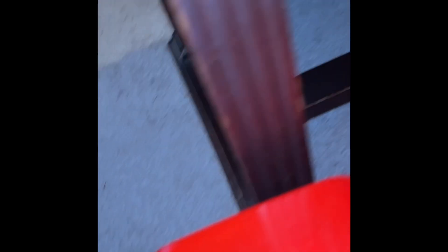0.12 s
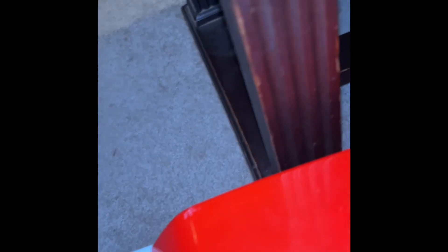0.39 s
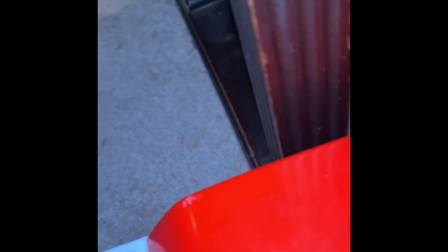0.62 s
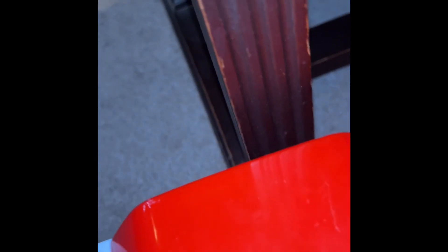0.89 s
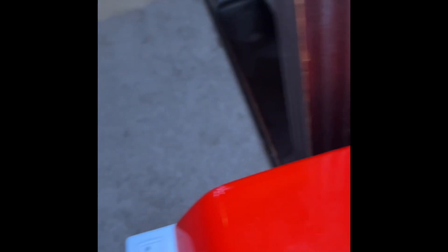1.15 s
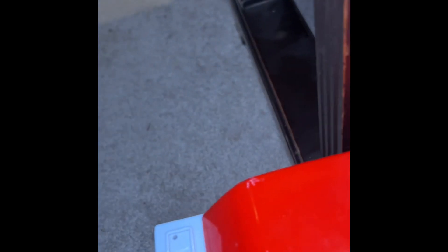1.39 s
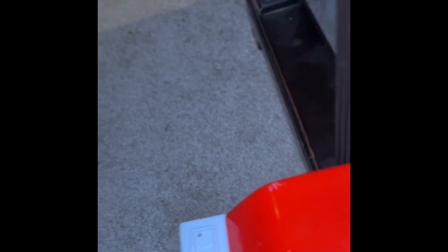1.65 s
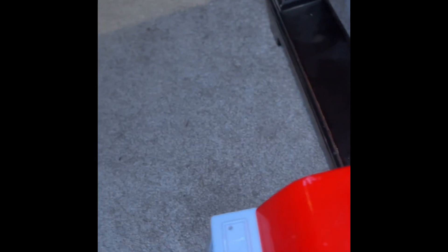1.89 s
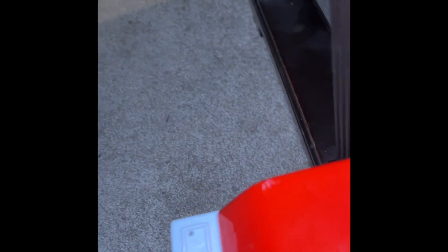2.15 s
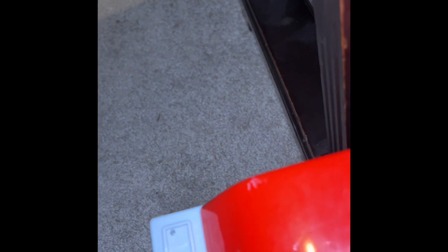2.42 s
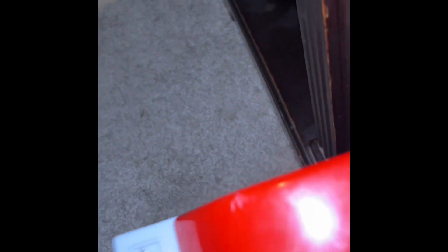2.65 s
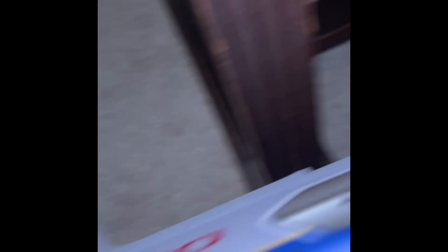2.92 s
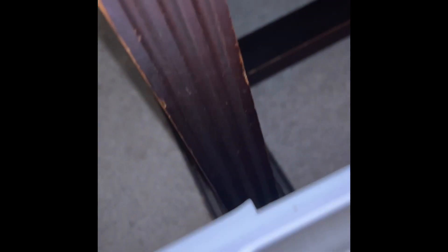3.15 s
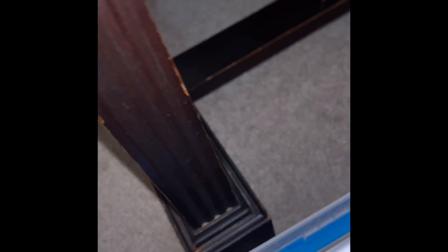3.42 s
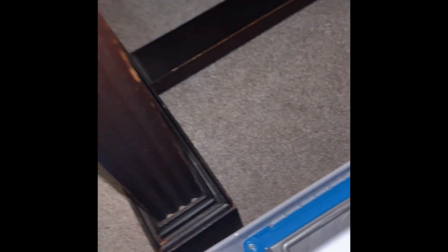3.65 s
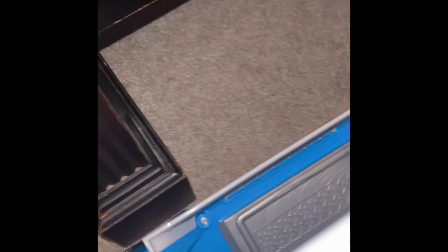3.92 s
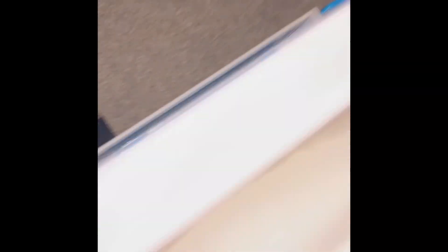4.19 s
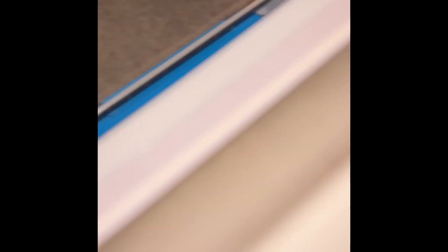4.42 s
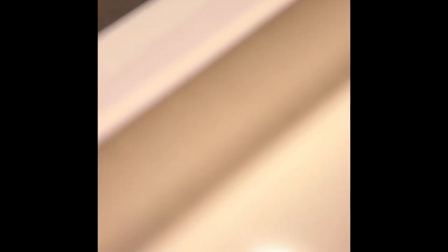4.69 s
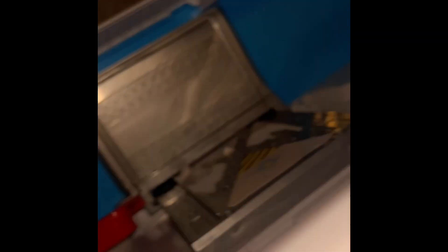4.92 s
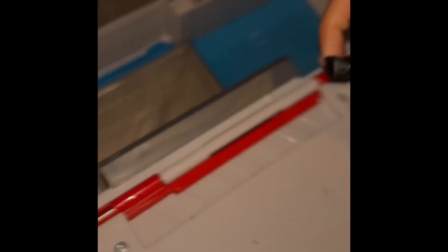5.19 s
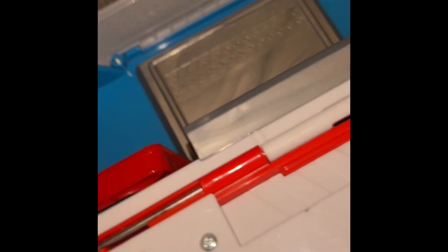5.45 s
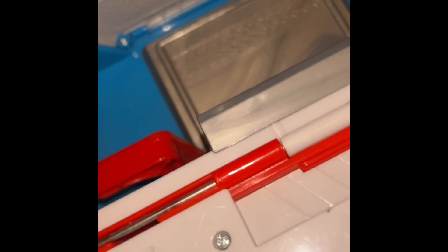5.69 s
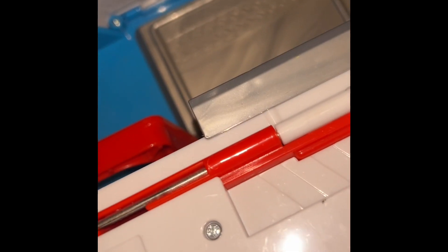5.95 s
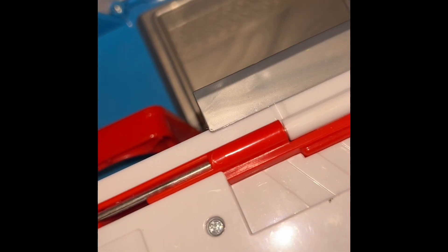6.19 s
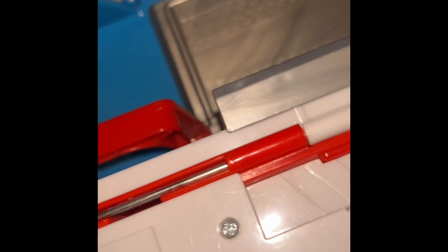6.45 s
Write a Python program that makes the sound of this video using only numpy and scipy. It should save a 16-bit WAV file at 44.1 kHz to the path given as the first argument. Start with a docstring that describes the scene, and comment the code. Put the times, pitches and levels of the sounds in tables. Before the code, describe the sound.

Plastic parts knock, scrape and click as hands turn and open a toy, loudest at a snapping latch, in a quiet carpeted room.

```python
"""In a quiet carpeted room, close by, a large hollow plastic toy is turned, opened and latched by hand.
Hard edges click and chatter and the shell booms dully: bursts of micro-contacts ring damped modes.
Parts drag and a drawer slides out by stick and slip; fingers rustle as shaped, grainy noise.
Soft low thumps are bass noise and one damped sine; a short room tail follows and a faint floor of
coloured noise lies below."""
import sys
import numpy as np
from scipy import signal
from scipy.fft import rfft, irfft
from scipy.io import wavfile
from scipy.ndimage import uniform_filter1d

SR = 44100
rng = np.random.default_rng(int(sys.argv[2]) if len(sys.argv) > 2 else 0)


def master(y):
    """Save y as 16-bit WAV."""
    cut = np.clip(np.atleast_2d(y).T, -1, 1)
    pcm = np.round(cut * 32767)  # scale
    wavfile.write(sys.argv[1], SR, pcm.astype(np.int16))


def how_loud(loudness_db):
    """Turn decibels into a plain amplitude multiplier (0 dB gives 1, 20 dB gives 10)."""
    steps = np.asarray(loudness_db, float) / 20
    return 10 ** steps


N = 290075


def rms_one(x):
    """Power normalisation: scales a signal to unit rms."""
    return x / np.sqrt(np.mean(x ** 2) + 1e-20)


def at_hz(points, hz):
    """Logarithmic frequency axis: interpolates a table evenly per octave."""
    table_hz, values = np.transpose(points)
    return np.interp(np.log(hz), np.log(table_hz), values)


def filtered(x, order, hz, kind="low"):
    """Linear filtering: a Butterworth filter of the given order and kind."""
    return signal.sosfilt(signal.butter(order, hz, kind, fs=SR, output="sos"), x)


def coloured(spectrum):
    """Spectral shaping: white noise weighted over frequency becomes steady coloured noise of rms 1."""
    hz = np.maximum(np.fft.rfftfreq(N, 1 / SR), 1)
    white = rfft(rng.standard_normal(N))
    return rms_one(irfft(white * how_loud(at_hz(spectrum, hz)), N))


def strokes(rows):
    """Envelope of rubbing: each stroke rises steeply, holds with an even swell in dB, then falls."""
    rise_db_per_s, fall_db_per_s = 900, 449.5
    t, power = np.arange(0, N + 64, 64) / SR, 0
    for start, length, db, swell_db in rows:
        held = db + swell_db * (np.clip((t - start) / length, 0, 1) - .5)
        before = rise_db_per_s * np.maximum(start - t, 0)
        after = fall_db_per_s * np.maximum(t - start - length, 0)
        power = power + how_loud(held - before - after) ** 2
    return np.interp(np.arange(N) / SR, t, np.sqrt(power))


def ring(force, hz, t60):
    """Damped resonance: a unit click sets a decaying sine of starting height 1 ringing."""
    r, w = how_loud(-60 / (t60 * SR)), 2 * np.pi * hz / SR
    return signal.lfilter([0, np.sin(w)], [1, -2 * r * np.cos(w), r * r], force + 1e-18)


def strike(modes, s, peak_db, chatter_ms, spread_db, favoured_hz=None, reach=.3, rise=.2, tilt_db=0):
    """Modal excitation: a blow's short dying chatter of micro-contacts drives every mode separately."""
    size = 1024
    age = np.arange(size) / (np.maximum(chatter_ms, .2)[:, None] * SR / 1000)   # in chatter times
    shape = np.exp(-age) * np.clip(age / rise, 0, 1)
    at = np.minimum(np.round(s * SR).astype(int)[:, None] + np.arange(size), N - 1)
    out = np.zeros(N)
    for hz, level_db, t60 in modes:
        chatter = shape * rng.standard_normal(shape.shape)
        # the push that this mode receives is evened, so a blow keeps its strength
        push = np.abs(chatter @ np.exp(-2j * np.pi * hz / SR * np.arange(size)))
        push = 0.87 * push + 0.16 * np.sqrt(np.sum(shape ** 2, axis=1))
        strength_db = peak_db + level_db + spread_db * rng.standard_normal(len(s))
        strength_db = strength_db + tilt_db * np.log2(hz / modes[0][0])   # tilt is per octave
        if favoured_hz is not None:   # modes far from the favoured pitch take less
            strength_db = strength_db - 10 * (np.log(hz / favoured_hz) / reach) ** 2
        blows = chatter * (how_loud(strength_db) / push)[:, None]
        force = np.bincount(at.ravel(), blows.ravel(), N)
        out += ring(force, hz, t60)
    return out


def drag(modes, per_s, uneven_db):
    """Stick and slip: dense uneven micro-contacts, shared out over the modes; rms 1."""
    slip_db = uneven_db * np.minimum(rng.exponential(1, N), 4)
    slips = (rng.random(N) < per_s / SR) * how_loud(slip_db)
    out = np.zeros(N)
    for hz, level_db, t60 in modes:
        out += how_loud(level_db) * ring(slips * rng.standard_normal(N), hz, t60)
    return rms_one(out)


# Spectrum of the faint floor. Each row: frequency in Hz, relative density in dB.
FLOOR_SPECTRUM = [(18, -31.5), (30, 1), (355, -15), (461, -3), (600, -38.5), (1040, -11.5), (1130, -17.5),
                  (2830, -26), (16000, -57.5)]


def floor():
    """Stationary noise: a faint floor, strongest in the bass, at a constant level."""
    return how_loud(-71) * coloured(FLOOR_SPECTRUM)


# Decay time of the room. Each row: frequency in Hz, time to fall by 60 dB in seconds.
ROOM_DECAY = [(200, 0.15), (1000, 0.19), (4000, 0.3), (12000, 0.1)]


def room(x):
    """Reverberant decay: half-octave bands die at their own rates, low ones as a fixed noisy echo
    pattern, high ones so dense that they are fresh noise carrying the stored energy."""
    dense_hz = 1900
    t, out = np.arange(SR // 2) / SR, 0
    for low in 110 * 2 ** np.arange(0, 7.1, .5):
        edges_hz = [low, min(np.sqrt(2) * low, .45 * SR)]
        band = filtered(x, 2, edges_hz, "band")
        decay = how_loud(-60 * t / at_hz(ROOM_DECAY, 1.4 * low)) * np.clip(t / 0.0037, 0, 1)
        decay = decay / np.sqrt(np.sum(decay ** 2))
        if low < dense_hz:
            out = out + signal.fftconvolve(band, decay * rng.standard_normal(len(t)))[:N]
        else:   # energy is followed at every eighth sample
            stored = signal.fftconvolve(band[::8] ** 2, 8 * decay[::8] ** 2)[:N // 8 + 1]
            stored = np.interp(np.arange(N) / 8, np.arange(len(stored)), np.abs(stored))
            noise = rms_one(filtered(rng.standard_normal(N), 2, edges_hz, "band"))
            out = out + np.sqrt(stored) * noise
    return out


# Soft low thumping. Each row: start in seconds, length in seconds, level in dB, swell over the length in dB.
LOW_THUMPS = [(0.0, .03, -57, -5), (.22, 0.34, -66, -4), (.9, 0.11, -68, 8), (1.25, 0.28, -64.5, 6),
              (1.81, .5, -70, -9), (2.76, 0.095, -49, -10), (2.95, 0.25, -51, 12), (3.44, 0.11, -47.5, -17),
              (3.92, 0.16, -51, -12), (4.28, 0.25, -42, 0), (4.7, 0.11, -41, 17.5), (5.15, 0.23, -45, -4),
              (5.42, 0.69, -66.5, -5), (6.4, .13, -72, 9)]
# One dull bump. Its values: time in seconds, level before the low-pass in dB, pitch in Hz, 60 dB decay in seconds.
DULL_BUMP = (3.837, -36, 70, .17)


def thumps():
    """Band-limited noise and a damped sine: soft thumps in the bass and one dull bump."""
    noise = rms_one(filtered(rng.standard_normal(N), 3, [88, 180], "band"))
    s, level_db, hz, t60 = DULL_BUMP
    click = how_loud(level_db) * (np.arange(N) == int(s * SR))
    return strokes(LOW_THUMPS) * noise + filtered(ring(click, hz, t60), 2, 150)


# Skin brushing over the surface. Each row: start in seconds, length in seconds, level in dB, swell in dB.
FINGER_STROKES = [(0.0, .04, -59.5, -3), (.06, .12, -70, 0), (.2, .1, -58.5, -3), (.41, 0.058, -54.5, -2),
                  (.52, .24, -69, -2), (.9, 0.028, -67, 2), (1.05, .035, -68, 3), (1.225, .33, -71.5, -6.5),
                  (1.72, .2, -70.5, -6.5), (2.05, .09, -67, -3), (2.39, .7, -72, -2), (3.45, .12, -74, -10),
                  (3.89, .68, -62.5, 2), (4.62, .38, -52.5, -12), (5.02, .14, -54, 5.5),
                  (5.175, .05, -43.5, -5), (5.27, .2, -59.5, -14), (5.53, .06, -63, -2),
                  (5.68, .04, -68, -1.5), (5.97, .05, -64.5, -9.5), (6.21, .08, -78, -6),
                  (6.42, .16, -75, 6)]
# Spectrum of skin on plastic. Each row: frequency in Hz, relative density in dB.
RUSTLE_SPECTRUM = [(880, -33.5), (1500, -3.5), (1660, -14), (2690, -22), (2910, -13), (8240, -13),
                   (16000, -19.5)]


def fingers():
    """Friction noise: skin on plastic rustles grainily, over a faint touch that never stops."""
    fine = rms_one(uniform_filter1d(rng.standard_normal(N), size=120))
    coarse = rms_one(uniform_filter1d(rng.standard_normal(N), size=900))
    grain = how_loud(2.2 * fine + 3.2 * coarse)
    resting = how_loud(-83)   # fingers resting on the plastic
    return (strokes(FINGER_STROKES) + resting) * rms_one(grain * coloured(RUSTLE_SPECTRUM))


# Parts dragging on each other. Each row: start in seconds, length in seconds, relative shell level in dB,
# panel level in dB, swell over the stroke in dB.
DRAG_STROKES = [(0.0, 0.021, -50, -50, -10), (0.208, 0.082, -44, -55, 2), (0.36, 0.091, -55.5, -51.5, -6.5),
                (0.555, 0.38, -70.5, -73.5, -4), (1.3, 0.073, -53.5, -54, 6),
                (1.45, 0.16, -63.5, -63, -9.5), (1.867, 0.39, -56.5, -59.5, -4),
                (2.376, 0.33, -48.5, -56, 4.5), (2.784, 0.24, -35.5, -46.5, 11.5),
                (3.049, 0.13, -32.5, -37, 2.5), (3.422, 0.25, -40.5, -43.5, -11),
                (3.85, .17, -44.5, -44, 14.5), (4.058, 0.1, -45.5, -43, -5), (4.576, 0.23, -32.5, -36, 2.5),
                (4.86, 0.47, -43.5, -49, -1.5), (5.216, 0.12, -33, -33.5, 1),
                (5.383, 0.083, -41.5, -50.5, -10.5), (5.501, .12, -58, -60.5, -13),
                (5.701, 0.38, -68.5, -82, -3), (6.4, .18, -70, -78.5, 3)]
# Modes of the toy's shell, panels and hard edges. Each row: frequency in Hz, relative level in dB,
# 60 dB decay in seconds.
SHELL_MODES = [(200, -10, 0.15), (225, -3.5, 0.13), (320, 0.5, 0.11), (370.4, -5, 0.096), (400, -3, 0.073),
               (426.2, -2, 0.057), (493, -25.5, 0.22), (490, -1, 0.068), (562.6, 3.5, 0.059)]
PANEL_MODES = [(646.5, -2.5, 0.041), (694.8, -2, 0.069), (765, -6.5, 0.052), (895, 3, 0.02),
               (1029.3, 0.5, 0.043), (1160, 2, 0.033), (1416, 1, 0.02), (1575, 0, 0.036), (1840, 5, 0.013),
               (2151, -2, 0.027)]
EDGE_MODES = [(2462, 4, 0.0058), (2976, -3, 0.0081), (3627, 5, 0.0033), (4404, 4.5, 0.0021),
              (5040, 3, 0.0017), (6420, 0.5, 0.0013), (7572, 2.5, 0.0012), (9330, -13, 0.0027),
              (10950, -14, 0.0021), (14100, -11.5, .002)]


def dragging():
    """Stick-slip friction: dragging excites the shell, the panels and, faintly, the edges."""
    table = np.array(DRAG_STROKES)
    shell_gain, panel_gain = strokes(table[:, [0, 1, 2, 4]]), strokes(table[:, [0, 1, 3, 4]])
    shell = how_loud(-5) * drag(SHELL_MODES, 600, uneven_db=3.5)
    panels = rms_one(filtered(drag(PANEL_MODES, 900, uneven_db=3.5), 2, 1200))   # slips are softer than blows
    panels = panels + how_loud(-23.5) * drag(EDGE_MODES, 2500, uneven_db=0.0)
    return shell_gain * shell + panel_gain * panels


# A drawer slides out in two pulls. Each row: start in seconds, length in seconds, rasp level in dB, swell in dB.
DRAWER_PULLS = [(4.252, .075, -18.5, 2), (4.34, 0.17, -19, -4.5)]
# Modes of the drawer. Each row: frequency in Hz, relative level in dB, 60 dB decay in seconds.
DRAWER_MODES = [(355, -4.5, 0.065), (520, -2.5, 0.026), (695, 0, 0.07), (1036, -4, 0.076),
                (1560, -4.5, 0.037), (1770, -13, 0.033)]


def drawer():
    """Stick-slip friction: the drawer rasps in its own modes, shakes the shell and crackles on the edges."""
    rasp = drag(DRAWER_MODES, 700, uneven_db=2.5)
    shell = how_loud(-6.5) * drag(SHELL_MODES, 400, uneven_db=3.5)
    edges = how_loud(-23.5) * drag(EDGE_MODES, 500, uneven_db=2.5)
    return strokes(DRAWER_PULLS) * (rasp + shell + edges)


def bumps():
    """Irregular impacts: knock rows for the small bumps that come unevenly while parts drag."""
    per_s = 95
    chance = rng.random((int(N / SR * per_s), 3))
    s = (np.arange(len(chance)) + chance[:, 0]) / per_s
    shell_gain = strokes(np.array(DRAG_STROKES)[:, [0, 1, 2, 4]])
    shell_gain = shell_gain[np.minimum((s * SR).astype(int), N - 1)]
    level_db = 20 * np.log10(shell_gain + 1e-6) + 8.5 + 4 * np.log(chance[:, 1] + .05)
    hz = 441 * (.8 + .4 * chance[:, 2])
    return np.transpose([s, np.maximum(level_db, -90), hz])


# Soft knocks on the hollow shell. Each row: time in seconds, relative strength in dB,
# pitch in Hz that the struck spot favours.
SHELL_KNOCKS = [(0.0441, -37, 320), (0.1, -41, 340), (0.2194, -25, 320), (0.293, -25.5, 350),
                (0.3286, -29, 320), (0.3583, -19.5, 376), (0.7504, -25.5, 359), (0.941, -41.5, 336),
                (1.081, -48.5, 337), (1.207, -44, 364), (1.2534, -21, 390), (1.269, -16.5, 400),
                (1.3775, -23, 440), (1.4012, -3, 342), (1.424, -17, 414), (1.7943, -34, 410),
                (1.8139, -4, 390), (1.907, -16, 430), (1.9702, -31, 350), (2.0003, -21.5, 360),
                (2.0664, -26, 363), (2.127, -21.5, 368), (2.2087, -34, 356), (2.308, -33.5, 355),
                (2.35, -35.5, 365), (2.4099, -11.5, 378), (2.499, -25.5, 374), (2.5544, -21, 378),
                (2.6303, -30.5, 330), (2.7398, -18, 400), (2.7613, -16, 366), (2.8892, -25, 410),
                (3.093, -19.5, 420), (3.134, -16, 490), (3.222, -34, 533), (3.3107, -37.5, 400),
                (3.4266, -11, 517), (3.445, -11, 400), (3.5903, -24, 530), (3.6625, -32.5, 464),
                (3.7106, -36, 320), (3.738, -32, 530), (3.9287, -25.5, 332), (4.0355, -27.5, 505),
                (4.1263, -29, 505), (4.2631, -12, 516), (4.559, -25.5, 506), (4.6714, -17, 434),
                (4.6993, -8, 510), (4.7886, -16, 447), (4.947, -31, 430), (5.0187, -24, 374),
                (5.1305, -25.5, 427), (5.147, -16.5, 446), (5.1648, -13.5, 414), (5.1935, 0, 381),
                (5.2338, -13.5, 353), (5.2722, -14.5, 460), (5.3238, -10, 400), (5.414, -16, 306),
                (5.5705, -36, 430), (5.6886, -35.5, 410), (5.8051, -34, 370), (5.9365, -41.5, 404),
                (5.9916, -32.5, 451), (6.0251, -35, 346), (6.1609, -40.5, 436), (6.319, -51, 320),
                (6.4029, -39.5, 470), (6.4543, -34.5, 405), (6.564, -49.5, 260)]


def knocks():
    """Modal excitation: knocks ring the shell modes near the pitch of the struck spot; gentler ones
    build up and last longer."""
    s, level_db, hz = np.transpose(np.vstack([SHELL_KNOCKS, bumps()]))
    contact_ms = 1.5 - .06 * np.maximum(level_db, -45)
    return strike(SHELL_MODES, s, level_db - 4.0, contact_ms, 1.5, favoured_hz=hz, reach=0.28, rise=0.81)


# Hard edge on edge. Each row: time in seconds, relative treble strength in dB, relative panel strength in dB,
# chatter scale in ms (stretched below for edges and panels).
HARD_CLICKS = [(0.0558, -41, -32, 0.62), (0.0733, -47, -34, 3.3), (0.1975, -21, -27, 2.06),
               (0.2197, -22, -19, 0.37), (0.2446, -40, -21, 0.26), (0.2527, -32, -22, 1.8),
               (0.3274, -30.5, -23, 0.55), (0.412, -41, -40.5, 6.2), (0.5986, -73, -47.5, 6.3),
               (0.7441, -52, -44, 1.4), (0.756, -73, -36.5, 1.2), (0.945, -72, -58.5, 6.4),
               (1.219, -50.5, -62, 2.2), (1.2495, -27.5, -22, 6.7), (1.3187, -51, -44, 2.3),
               (1.3506, -46.5, -35, 3.8), (1.3652, -36.5, -26, 5.8), (1.3888, -23, -10, 32),
               (1.397, -7, -7, 3.1), (1.783, -44, -44.5, 8.4), (1.8112, -14.5, -14.5, 1.93),
               (1.9056, -28, -18, 3.1), (1.9668, -24.5, -28, 2.2), (2.0634, -48, -37.5, 2.1),
               (2.091, -47, -43, 7), (2.1321, -23, -31, 2.6), (2.1556, -45, -42, 3.8),
               (2.254, -73, -45, 3.1), (2.3052, -50, -34, 1.3), (2.3532, -45.5, -42, 3.6),
               (2.3796, -42.5, -41, 9), (2.403, -33.5, -29.5, 4.7), (2.4628, -32.5, -23.5, 0.81),
               (2.5293, -42.5, -39, 1.1), (2.5573, -34, -30.5, 5.2), (2.574, -43, -30.5, 2.7),
               (2.6507, -17.5, -18.5, 2.8), (2.7403, -39.5, -33, 4.8), (2.7568, -27.5, -24, 4.9),
               (2.8595, -30, -32.5, 2.26), (2.9393, -33, -36.5, 2.4), (2.977, -33.5, -38, 2.8),
               (3.0218, -28.5, -25.5, 1.7), (3.0527, -37.5, -31, 2.5), (3.106, -42, -32, 2.6),
               (3.1641, -31, -18, 2.2), (3.2213, -31, -35.5, 4.4), (3.3071, -53, -41, 8.2),
               (3.3662, -58, -45, 0.96), (3.4137, -23, -14.5, 1.6), (3.4265, -14.5, -14.5, 3.5),
               (3.4758, -25.5, -21.5, 4.8), (3.5526, -24, -27, 2.5), (3.5914, -40, -24, 6.6),
               (3.6166, -32.5, -43, 4.9), (3.7393, -71, -25.5, 0.88), (3.7679, -68.5, -36.5, 1.3),
               (3.8495, -51.5, -40.5, 0.63), (3.8834, -54, -39.5, 0.59), (3.9092, -36, -34, 4.4),
               (3.9636, -34.5, -24, 1.8), (4.0202, -38, -31, 5.1), (4.0345, -20.5, -15.5, 4.55),
               (4.1248, -49, -30.5, 3.2), (4.1473, -53, -30, 3.7), (4.2186, -30, -17.5, 2.4),
               (4.2413, -21.5, -18, 7.5), (4.2591, -14.5, -6, 2.3), (4.2799, -18.5, -11.5, 1.1),
               (4.3051, -30, -19, 1.9), (4.3417, -31, -19, 7.7), (4.3591, -25, -13, 3.5),
               (4.3816, -17, -8.5, 5.2), (4.4083, -22.5, -14.5, 1), (4.4298, -21.5, -12.5, 1.04),
               (4.4562, -27, -18, 4.7), (4.5017, -23.5, -22, 2.8), (4.5606, -24.5, -11, 2.26),
               (4.62, -19, -22, 15), (4.6724, -29, -8, 1), (4.6981, -17.5, -11.5, 3.35),
               (4.7298, -28, -21, 5.4), (4.7592, -19.5, -16.5, 3.8), (4.789, -23.5, -17, 5.1),
               (4.8001, -19, -7, 2.8), (4.851, -37, -59, 3.9), (4.9442, -47, -32, 1.9),
               (5.0146, -29.5, -30, 5.1), (5.0367, -45.5, -28.5, 2.1), (5.0589, -25, -16.5, 2.54),
               (5.1114, -35.5, -35, 2.7), (5.134, -39.5, -33, 7.2), (5.16, -9.5, -9, 6.9),
               (5.183, -5.5, -10.5, 5.7), (5.1902, -8, -10, 2.3), (5.2025, -3.5, -3.5, 0.85),
               (5.2368, -40.5, -17.5, 3), (5.2853, -22.5, -21, 1.5), (5.294, -19, -20, 6.2),
               (5.3184, -11, -5, 3.7), (5.4133, -24.5, -24.5, 1.56), (5.4245, -30.5, -29.5, 1.9),
               (5.5393, -44.5, -40.5, 6.5), (5.685, -64.5, -40, 6.1), (5.708, -41.5, -43.5, 1.2),
               (5.81, -61, -40, 8.2), (5.9884, -41.5, -35.5, 1.9), (6.1618, -76, -50, 2.1),
               (6.2058, -63, -90, 2.3), (6.36, -57.5, -72, 3), (6.402, -69, -43, 4.9),
               (6.4327, -44, -35, 7.5), (6.4514, -41, -36.5, 2), (6.4841, -40, -37.5, 1.3),
               (6.5414, -62, -60.5, 2)]
# As the toy is turned, clicks favour other panels. Each row: time in seconds, favoured pitch in Hz.
FACING_PANEL = [(0.0, 792), (0.05, 1100), (1.43, 1016), (1.68, 1240), (1.9, 740), (2.34, 1200), (2.38, 865),
                (2.65, 1300), (2.99, 640), (3.61, 933), (3.85, 744), (3.98, 1120), (4.49, 720),
                (5.04, 1100), (5.26, 755), (6.43, 766.5), (6.5, 1570), (6.58, 1410)]


def clicks():
    """Impact hardness: contacts ring edges and panels together; a duller one loses its top first."""
    s, treble_db, panel_db, ms = np.transpose(HARD_CLICKS)
    hardness_db = np.clip(treble_db - panel_db, -25, 5)
    edges = strike(EDGE_MODES, s, treble_db - 5.5, 2.0 * ms, 1.5, rise=0.12,
                   tilt_db=0.16 * (hardness_db + 6))
    favoured_hz = np.interp(s, *np.transpose(FACING_PANEL))
    panels = strike(PANEL_MODES, s, panel_db - 7.0, 1.81 * ms + 0.99, 2.0, rise=0.18,
                    favoured_hz=favoured_hz, reach=1.05)
    return edges + filtered(panels, 2, 3000)   # heavy panels do not follow the fastest jolts


def scene():
    """Superposition: toy, room tail, thumps and floor add; a small toy radiates no deep bass."""
    sources = fingers() + dragging() + drawer() + knocks() + clicks()
    toy = filtered(sources, 5, 165, "high")
    return (floor() + how_loud(-11) * room(toy) + thumps() + toy)[None]


def top_cut(x):
    """Nothing passes above the cut-off."""
    return signal.sosfilt(signal.butter(12, 17000, fs=SR, output="sos"), x)


def record(dry):
    """Band limits and soft saturation: deep bass is cut, peaks are rounded, the top is cut."""
    bass_cut = filtered(dry, 4, 42, "high")
    rounded = .9 * np.tanh(bass_cut / .9)
    mix = signal.sosfilt(signal.cheby2(12, 70, 16700, fs=SR, output="sos"), rounded)
    return top_cut(mix)


dry = scene()
out = record(dry)
master(out)
```